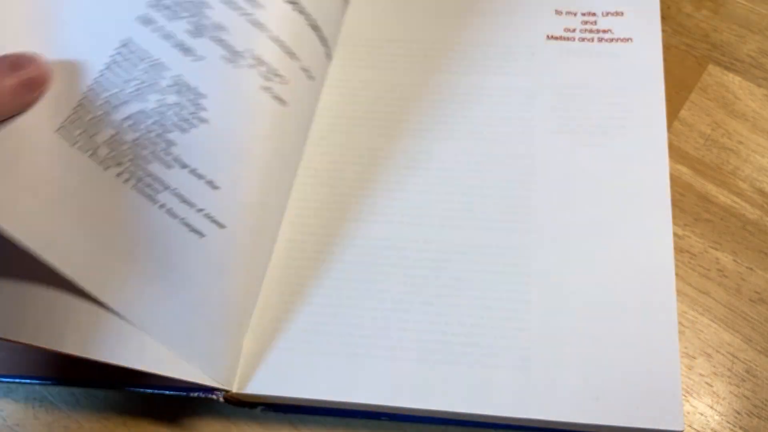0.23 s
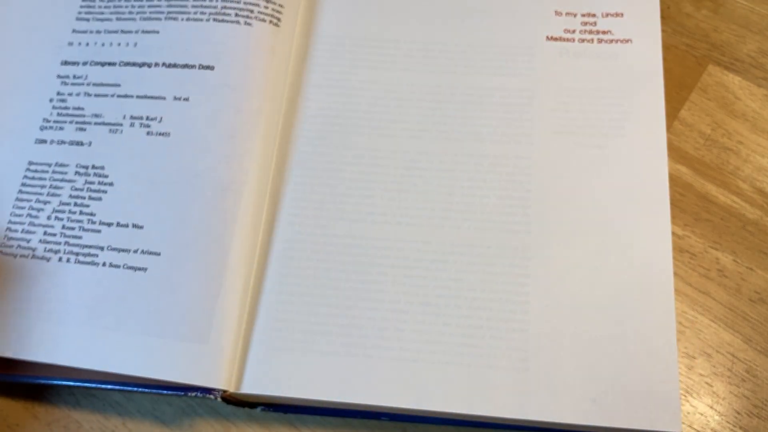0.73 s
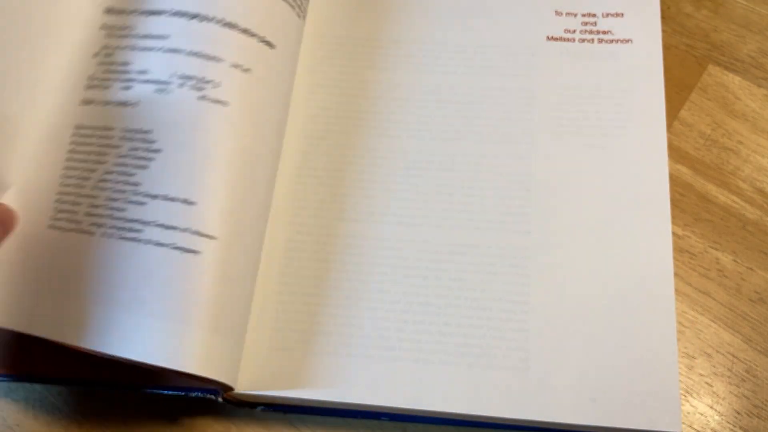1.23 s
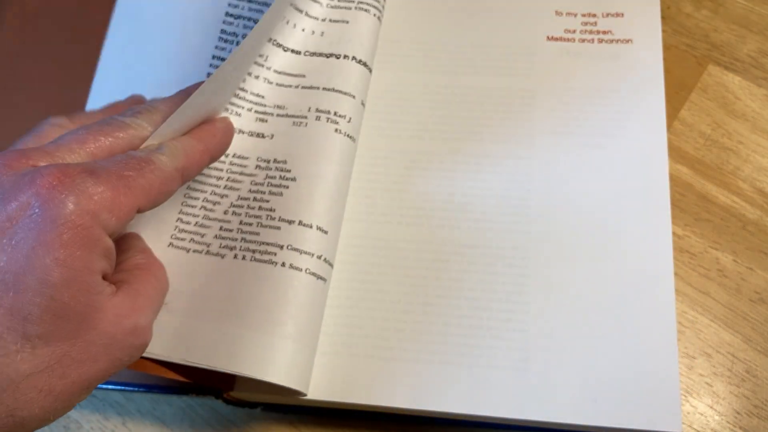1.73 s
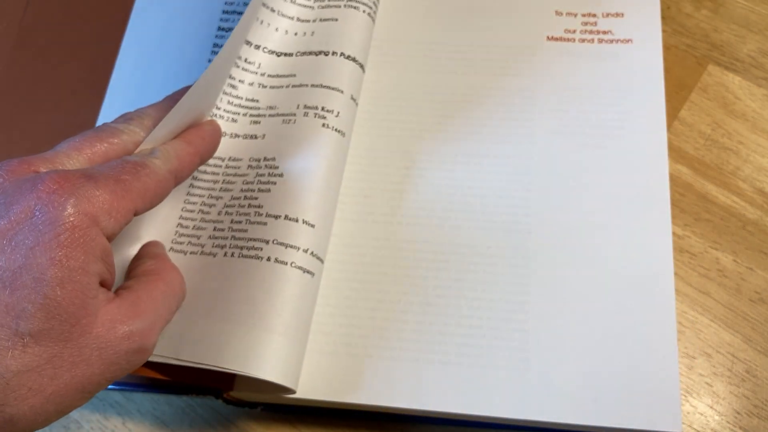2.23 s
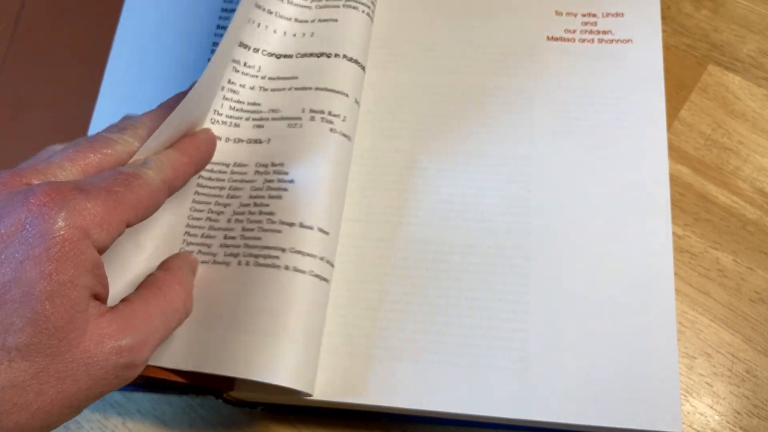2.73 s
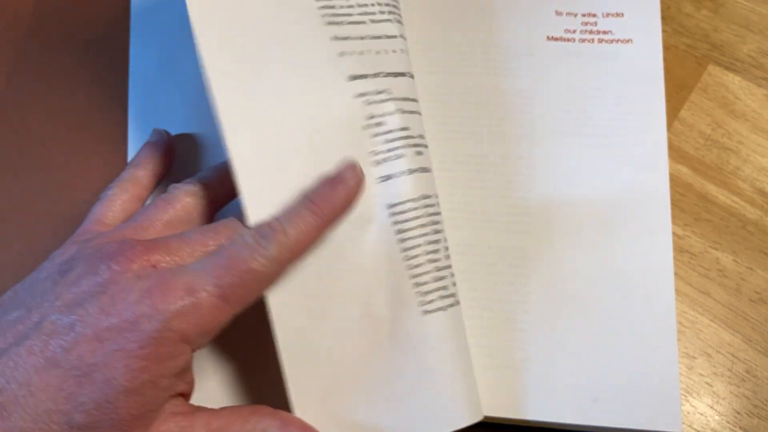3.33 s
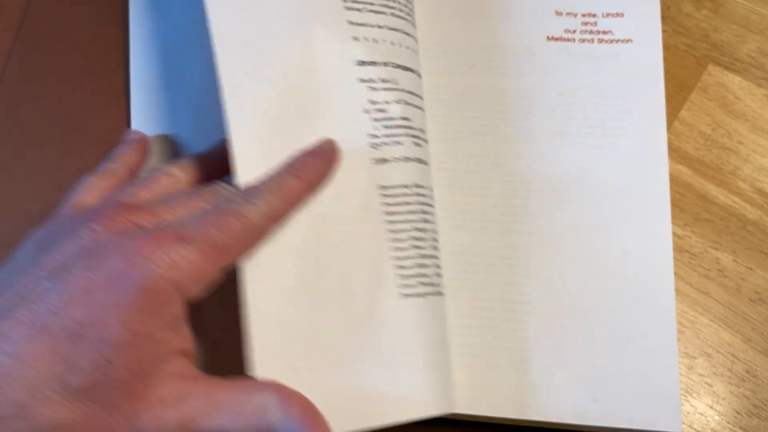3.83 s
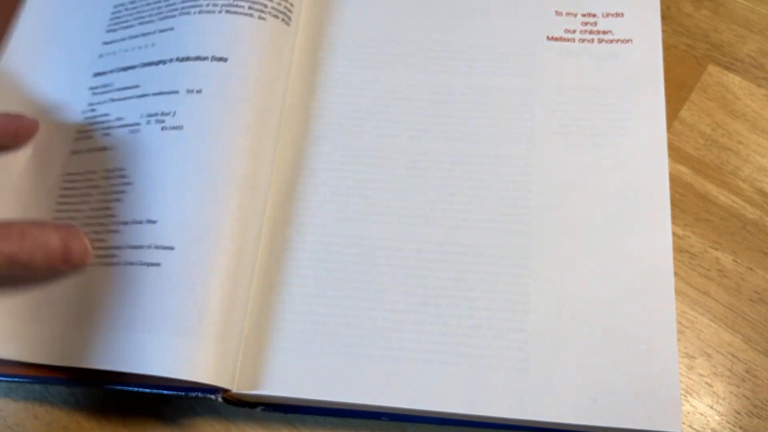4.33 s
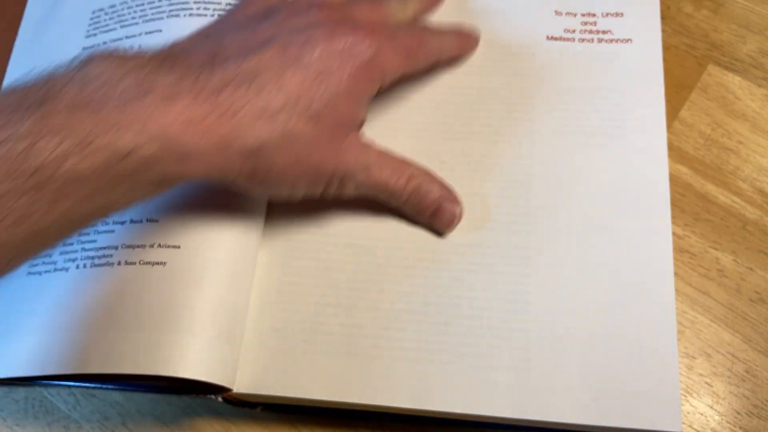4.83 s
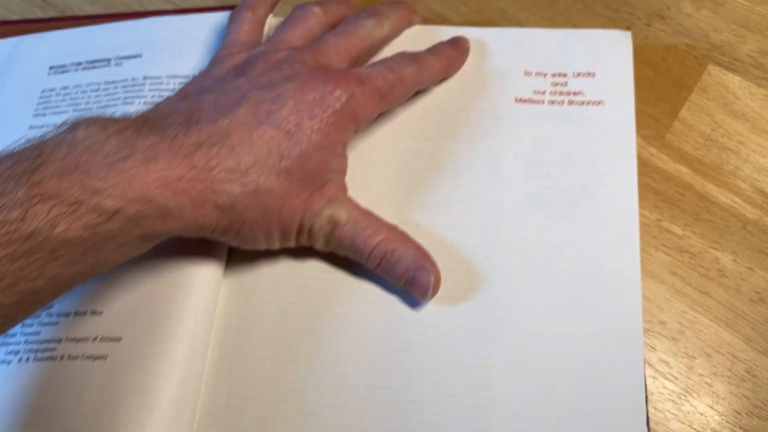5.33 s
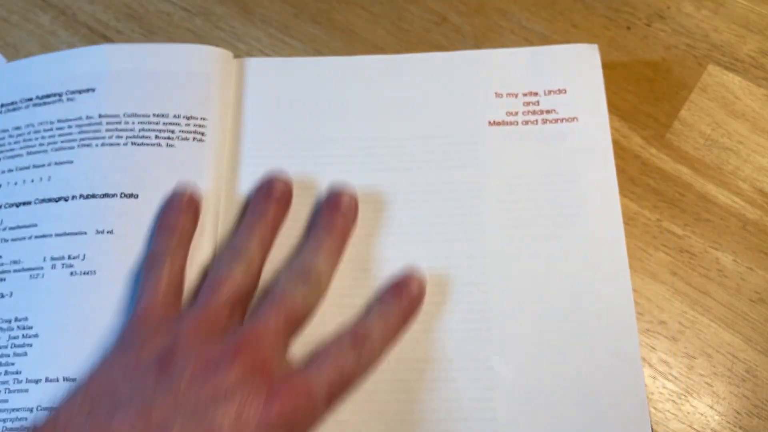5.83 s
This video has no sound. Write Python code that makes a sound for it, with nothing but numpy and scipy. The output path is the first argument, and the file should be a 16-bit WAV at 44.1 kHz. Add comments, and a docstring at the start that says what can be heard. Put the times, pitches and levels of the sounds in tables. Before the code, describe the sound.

Stiff book pages turned by hand, sliding and snapping crisply, then smoothed flat with a palm in a quiet room.

```python
"""Turning the pages of a hardback

A quiet room, the microphone close to a book on a wooden table, a hand turning the stiff leaves.
Sheets slide over each other with a grainy hiss; each time a bent sheet buckles it snaps and rattles.
Page edges scuff and the page block thuds softly under the fingers. At the end the palm smooths
the open pages flat and the fingertips squeak faintly to a stop."""
import sys
import numpy as np
from scipy import signal
from scipy.fft import rfft, irfft, next_fast_len
from scipy.io import wavfile
from scipy.ndimage import map_coordinates

SR = 44100
rng = np.random.default_rng(int(sys.argv[2]) if len(sys.argv) > 2 else 0)


def wav_record(signal):
    """Record a signal, one row per channel, as 16-bit PCM in the file named by sys.argv[1]."""
    frames = np.transpose(np.atleast_2d(signal))
    bounded = np.clip(frames, -1, 1)
    # unit amplitude maps onto the largest positive 16-bit level
    quanta = np.round(bounded * 32767).astype(np.int16)
    wavfile.write(sys.argv[1], SR, quanta)


N = 267863
T = np.arange(N) / SR

# Bent sheets buckling close to the microphone. Each row: start in seconds, energy in dB, low thump in dB,
# hollow tone near 2.5 kHz in dB, ring in dB, ring pitch in Hz, crispness in dB, first crack's share 0-1.
BUCKLES = [(0.106, -11, 16, 0, 5.5, 4300, -7, 0.25), (0.12, -5, -4, 1.5, 9, 2900, -18, 0.28),
           (0.1435, -9.5, -5, -8, -4, 4100, -18, .1), (0.182, -20, -1, -21, -18, 4100, -12, 0.46),
           (0.446, -30.5, -12, 0, -18, 4100, -9, 0.34), (1.0935, -6, -25, -8.5, 3, 1290, -14, 0.82),
           (1.3254, -.5, -2, -1.5, 4, 3870, 10.5, 0.23), (1.504, -2.5, 2, 6, 14.5, 4400, 9.5, 0.44),
           (1.688, -19, -2, -1, -8, 4100, -24, 0.4), (1.749, -17.5, -5, -8.5, -6, 4100, -16, .1),
           (2.263, -26, 6, -10, -12, 4100, -12, .2), (2.3184, 5.5, -9.5, 0.5, -1, 3900, 5, 0.02),
           (2.9292, -3.5, -3, 0, 7.5, 4400, 13.5, 0.22), (3.0236, -18, 10, 5, 0, 4100, 27, .5),
           (3.03, -5, -26, 1.5, -.5, 4100, 14, 1), (3.0323, -9, -8, 1, 3, 4100, 14, 0.67),
           (3.066, -9, 15, 4, -14, 4100, 1, 0.75), (3.0747, -15, -2, 2, -4, 4100, 10, .3),
           (3.167, -3.5, -2, -0.5, 8.5, 4800, -3, 0.44), (3.3119, -8, -1, 1, 5.5, 4440, -2, 0.25),
           (3.327, -9.5, 0, 0, -4, 4100, -11, 0.2), (3.5617, -11, -4, -5, -1, 4630, -19, 0.14),
           (3.579, -11, -2.5, -3, -5, 3960, -3.5, 0.25), (3.7444, -9, 6, -6, -1, 4300, -10.5, 0.45),
           (3.887, -15, -3, -5, -10, 4100, -12, 0.08), (3.934, -17.5, -5, -8, -11, 4100, -12, 0.03),
           (4.0569, -3, -8, 2.5, 1.5, 3900, 4.5, 0.44), (4.0936, -15.5, -13, 6.5, 2, 4100, -6, 0.5),
           (4.1118, -8, -1, 2, 15.5, 4260, -3, 0.5), (4.1134, 3, -9.5, -10.5, 18.5, 3830, 0.5, 0.72),
           (4.1207, -4, -5.5, -3.5, -2, 3900, -8, 0.45), (4.3438, -15.5, -10, -1, -7, 4100, -9, 0.13),
           (4.6004, -8.5, -4.5, 3, -4.5, 3630, -13, 0.14), (5.007, -28, -8, 0, -19, 4100, -14, 0.65)]
# Tone of a buckling sheet. Each row: frequency in Hz, level in dB.
BUCKLE_COLOUR = [(60, -22), (220, -8.5), (330, -10.5), (480, -1), (1100, 1.5), (1600, -1), (2100, -4),
                 (3000, -5), (4000, 0.5), (5200, -9), (7000, -12), (10000, -24), (15000, -41)]
# The open book ringing on after a snap. Each row: frequency in Hz, width in Hz, relative level in dB.
BOOK_RESONANCES = [(554, 47, -1), (890, 24, 0.5), (1028, 29, 1.5), (1240, 40, -2), (1730, 72, -1),
                   (2317, 54, 2.5)]
# Swells of sliding hiss on paper: sheets moving and, last, the palm's first sweep. Each row: fastest
# moment, rise and fall in seconds, hiss in dB, body over hiss in dB, air over hiss in dB.
SLIDE_SWELLS = [(.17, .15, 0.061, -51.5, 1.5, -4.5), (.3, .05, 0.19, -67.5, 2.5, -10.5),
                (.66, 0.04, 0.084, -66, 0.5, -12), (.94, 0.052, 0.017, -60.5, 0.5, -2),
                (1.14, 0.07, 0.086, -57.5, -7.5, -4), (1.275, .05, 0.067, -55, -0.5, -3.5),
                (1.43, .03, .04, -59.5, -7.5, -4.5), (1.54, 0.05, 0.093, -59, 4.5, -3),
                (1.73, 0.063, 0.03, -59, 1, -6), (1.8, 0.044, 0.19, -75.5, 8.5, 6),
                (2.35, .06, 0.11, -74.5, 12, 2), (2.64, 0.032, 0.053, -71, 9, -3),
                (2.87, 0.095, 0.31, -60, 3, -0.5), (3.12, 0.038, 0.047, -54.5, 4.5, -2.5),
                (3.25, 0.073, 0.17, -63.5, 11, -1.5), (3.494, .014, 0.016, -65, 7.5, -7),
                (3.655, .015, .04, -65, 2.5, -3), (3.8, 0.062, 0.084, -65, 4, -1.5),
                (3.97, 0.077, 0.17, -59, -0.5, -2.5), (4.23, 0.055, 0.078, -60, 0.5, -2.5),
                (4.61, 0.084, 0.031, -59, 2, -3.5)]
# Tone of sliding on paper. Each row: frequency in Hz, level in dB.
SHEET_COLOUR = [(59, -59), (100, -10), (173, -5), (378, -8.5), (552, 0.5), (712, -8), (879, 4), (956, 0),
                (1230, 3), (1340, -0.5), (2220, -5.5), (4370, -2.5), (5170, -7), (8410, -15), (15500, -31)]
# The palm's pass over the page. Each row: time in seconds, hiss in dB before the palm's trim in the mix,
# body over hiss in dB, air over hiss in dB.
PALM_STROKE = [(4.66, -60.5, -0.5, 0), (4.788, -60, -2, -1.5), (4.916, -53, -8, -11.5),
               (5.026, -71, 9, 0.5), (5.174, -65, 4, 1), (5.416, -67, 4.5, 0), (5.45, -62.5, 2.5, -5.5),
               (5.79, -57.5, -4, 0.5), (5.852, -63.5, 1.5, 3), (5.918, -57.5, -11, -6),
               (5.982, -62.5, -2, -8), (6.02, -86.5, 9.5, -1), (6.06, -88, 5, 0)]
# Tone of skin on paper. Each row: frequency in Hz, level in dB.
PALM_COLOUR = [(59, -35), (100, 5), (223, 1), (420, 0.5), (712, 4.5), (956, 0.5), (1060, 4), (1130, 1),
               (1310, 1.5), (3930, -5), (4660, -9), (8230, -9.5), (15500, -18.5)]
# A page edge brushing its neighbours. Each row: start and length in seconds, level in dB,
# tilt above 900 Hz in dB per octave.
EDGE_SCUFFS = [(0, 0.025, -41.5, -13), (0.706, 0.017, -50.5, 0), (0.793, 0.049, -58.5, 1),
               (1.022, 0.048, -57.5, 0.5), (1.477, 0.024, -50, -6), (2.874, 0.022, -47.5, -8),
               (3.882, 0.029, -42.5, 0.5), (4.248, 0.023, -48, 2), (4.292, 0.056, -42.5, 3),
               (4.401, 0.037, -44.5, 0.5)]
# Fingers and page block pressing on the book. Each row: start in seconds, energy in dB, pitch in Hz.
BLOCK_THUDS = [(.978, -32.5, 540), (1.538, -24, 500), (3.066, -18, 112), (3.088, -20, 540),
               (3.117, -28.5, 130), (3.398, -22, 152), (4.713, -25.5, 150)]
# Skin or a sheet edge sticking and slipping. Each row: middle and spread in seconds, level in dB,
# pitch in Hz, nominal bandwidth in Hz.
SLIP_SQUEAKS = [(0.819, 0.017, -68, 7650, 1200), (.925, 0.025, -61.5, 7200, 700),
                (0.918, 0.019, -66, 10600, 700), (1.152, .04, -69, 10600, 1100),
                (2.887, 0.046, -64, 9250, 700), (4.712, 0.0018, -59, 6300, 400),
                (4.899, .04, -57, 3840, 600), (4.906, 0.038, -57, 1090, 170), (5.918, 0.04, -59, 3900, 452),
                (5.936, 0.055, -64.5, 713, 80)]
# Reflections reaching the microphone off table and cover. Each row: delay in seconds, gain.
NEAR_ECHOES = [(.0027, 0.049), (.0064, 0.023)]
# Room tone, the still air behind the book. Each row: frequency in Hz, relative level in dB.
ROOM_TONE_COLOUR = [(15, -43), (25, -8), (233, -2), (340, -7.5), (509, -5), (919, -24.5), (1080, -20),
                    (1170, -14), (2360, -23.5), (4150, -21.5), (7700, -25), (9050, -23.5), (10400, -28.5),
                    (11500, -27.5), (15500, -30.5)]


def snaps(size=16384, delay_at_1khz_s=0.000606, rise_s=0.00097, longest_t60_s=0.081, book_db=-12):
    """A buckle cracks once; bending waves then rattle to and fro in the sheet and set the book ringing."""
    out, t, hz = np.zeros(N), np.arange(size) / SR, freqs(size)
    octave = np.log2(hz)
    # bending waves are faster at high pitch, so the crack arrives as a very short chirp
    bending = np.exp(-4j * np.pi * delay_at_1khz_s * np.sqrt(1000 * hz))
    for s, db, thump_db, hollow_db, ring_db, ring_hz, crisp_db, share in BUCKLES:
        colour = curve(BUCKLE_COLOUR, hz)
        colour += thump_db / (1 + (hz / 700) ** 4)
        colour += crisp_db / (1 + (5800 / hz) ** 6)
        colour += hollow_db * bell(octave, np.log2(2500), 0.42)
        colour += ring_db * bell(octave, np.log2(ring_hz), 0.33)
        sheet = minimum_phase(colour)
        crack = unit(irfft(sheet * bending))
        # the more a buckle spends on its first crack, the sooner its rattle builds and dies
        t60 = longest_t60_s * (1 - 0.85 * share)
        build_up = 1 - np.exp(-t / (rise_s * (1 - share) + 1 / SR))
        rattle = unit(shape(burst(t, t60) * build_up, sheet))
        book = unit(shape(burst(t, 2.3 * t60), resonances(BOOK_RESONANCES, hz) * sheet))
        snap = np.sqrt(share) * crack + np.sqrt(1 - share) * (rattle + undb(book_db) * book)
        add(out, s - delay_at_1khz_s / 2, undb(db) * snap / np.linalg.norm(snap))
    return out


def slides(size, roundness=1.71):
    """A sheet or the palm speeds up over paper and coasts to rest; overlapping swells add their power."""
    power = np.zeros((3, N))
    for s, rise_s, fall_s, hiss_db, body_db, air_db in SLIDE_SWELLS:
        from_peak = np.abs(T - s) / np.where(T < s, rise_s, fall_s)
        speed = np.exp(-.5 * from_peak ** roundness)
        peak_gains = undb([hiss_db + body_db, hiss_db, hiss_db + air_db])
        power += np.outer(peak_gains, speed) ** 2
    grain = air_gap(fibres(size, catch_rate=500, catch_db=-10.5, flutter_db=2.15))
    return rubbing(np.sqrt(power), SHEET_COLOUR, grain)


def palm(size, landing_s=.03):
    """The palm settles on the page and strokes it flat without lifting."""
    s, hiss_db, body_db, air_db = np.transpose(PALM_STROKE)
    contact = np.clip(1 + (T - s[0]) / landing_s, 0, 1)
    gains = [contact * undb(np.interp(T, s, db)) for db in (hiss_db + body_db, hiss_db, hiss_db + air_db)]
    grain = air_gap(fibres(size, catch_rate=800, catch_db=-7, flutter_db=0.8))
    return rubbing(gains, PALM_COLOUR, grain)


def fibres(size, catch_rate, catch_db, flutter_db):
    """Friction: countless tiny slips, a few fibres that catch harder, and uneven pressure."""
    catches = (rng.random(size) < catch_rate / SR) * rng.standard_normal(size)
    slips = rng.standard_normal(size) + undb(catch_db) * unit(catches)
    pressure = undb(flutter_db * wander(70, size))
    return unit(slips * pressure)


def air_gap(grain, resonance_hz=3880, drift_octaves=0.063, drifts_per_s=2.85, reflection=0.061):
    """Friction noise bounces twice in the gap under sheet or hand; its comb glides as the gap changes."""
    i = np.arange(len(grain))
    lag = SR / (resonance_hz * 2 ** (drift_octaves * wander(drifts_per_s, len(grain))))
    return unit(sum(reflection ** k * map_coordinates(grain, [i - k * lag], order=3) for k in range(3)))


def rubbing(gains, colour, grain):
    """Friction heard through the sheet in three bands: a wide free sheet adds body, a light touch air."""
    hz = freqs(len(grain))
    paper = undb(curve(colour, hz))
    body = 1 / (1 + (hz / 2600) ** 6)
    air = 1 / (1 + (6000 / hz) ** 6)
    hiss = 1 - body - air
    return sum(gain * unit(shape(grain, paper * band))[:N] for gain, band in zip(gains, (body, hiss, air)))


def scuffs(size=8192):
    """The edge of a page drags past in a short, rough swell."""
    out, t, hz = np.zeros(N), np.arange(size) / SR, freqs(size)
    for s, length_s, db, tilt_db in EDGE_SCUFFS:
        grain = fibres(size, catch_rate=1100, catch_db=0.5, flutter_db=0)
        colour = curve(SHEET_COLOUR, hz) + tilt_db * np.log2(np.maximum(hz, 900))
        scrape = unit(shape(grain, undb(colour)))
        swell = np.sin(np.pi * np.minimum(t / length_s, 1))
        add(out, s, undb(db) * scrape * swell)
    return out


def thuds(size=8192):
    """The heavily damped page block answers a push with a few dull cycles."""
    out, t, hz = np.zeros(N), np.arange(size) / SR, freqs(size)
    for s, db, pitch_hz in BLOCK_THUDS:
        block = resonances([(pitch_hz, 1.2 * pitch_hz, 0)], hz) ** 2
        thud = shape(burst(t, t60=0.057), block)
        add(out, s, undb(db) * thud / np.linalg.norm(thud))
    return out


def squeaks(size=16384):
    """Fast, irregular slips ring one resonance of the pressed sheet until it almost sings."""
    out, t, hz = np.zeros(N), np.arange(size) / SR, freqs(size)
    middle_s = t[-1] / 2
    for s, spread_s, db, pitch_hz, width_hz in SLIP_SQUEAKS:
        slips = fibres(size, catch_rate=330, catch_db=-3, flutter_db=4)
        sheet = resonances([(pitch_hz, 1.14 * width_hz, 0)], hz) ** 2
        tone = unit(shape(slips, sheet))
        add(out, s - middle_s, undb(db) * tone * bell(t, middle_s, spread_s))
    return out


def room(x, wet_db, t60_low, t60_high, split_hz, size=22050):
    """Quick echoes from table and cover, then a faint tail whose treble dies first."""
    t = np.arange(size) / SR
    low = 1 / (1 + (freqs(size) / split_hz) ** 2)
    tail = shape(burst(t, t60_low), low) + undb(-10) * shape(burst(t, t60_high), 1 - low)
    response = undb(wet_db) * tail * (1 - np.exp(-t / 0.0013))
    response[0] += 1  # the direct path to the microphone
    for delay_s, gain in NEAR_ECHOES:
        response[int(delay_s * SR)] += gain
    return signal.fftconvolve(x, response)[:N]


def room_tone(size, level_db=-66.5):
    """The still air of the room: a steady, low hush."""
    colour = curve(ROOM_TONE_COLOUR, freqs(size))
    hush = shape(rng.standard_normal(size), undb(colour))
    return undb(level_db) * unit(hush)[:N]


def undb(db):
    """Decibels to gain."""
    return 10 ** (np.asarray(db) / 20)


def unit(x):
    """Scale to an rms of 1."""
    return x / np.sqrt(np.mean(x ** 2))


def freqs(size):
    """Frequencies of the bins of a real transform, kept above zero."""
    return np.maximum(np.fft.rfftfreq(size, 1 / SR), 1)


def curve(points, hz):
    """Level in dB of (Hz, dB) points joined on a log axis."""
    f, db = np.transpose(points)
    return np.interp(np.log(hz), np.log(f), db)


def shape(x, gain):
    """Filter by a gain for each frequency bin."""
    return irfft(rfft(x) * gain, len(x))


def minimum_phase(db):
    """Causal response of a dB curve: nothing sounds before the blow."""
    cepstrum = irfft(np.log(undb(db)))
    half = len(cepstrum) // 2
    return np.exp(rfft(np.r_[cepstrum[0], 2 * cepstrum[1:half], np.zeros(half)]))


def resonances(modes, hz):
    """Summed response of (Hz, width Hz, dB) resonances."""
    return sum(undb(db) / (1 + 1j * (hz / f - f / hz) * f / width) for f, width, db in modes)


def bell(x, centre, width):
    """Gaussian bump of height 1."""
    return np.exp(-.5 * ((x - centre) / width) ** 2)


def burst(t, t60):
    """Noise with an energy of 1 that falls 60 dB in t60 seconds."""
    x = rng.standard_normal(len(t)) * np.exp(-np.log(1000) * t / t60)
    return x / np.linalg.norm(x)


def wander(rate, size):
    """Glide between random values of spread 1, rate times a second."""
    step = np.arange(size) * rate / SR
    return np.interp(step, np.arange(size), rng.standard_normal(size))


def add(out, s, x):
    """Mix x into out from time s on."""
    i = max(int(s * SR), 0)
    out[i:i + len(x)] += x[:len(out) - i]


def scene(palm_trim_db=-1.6):
    """Paper and hand up close, the room and its hush behind them, in mono."""
    size = 2 * next_fast_len(N // 2 + 1)
    paper = snaps() + slides(size) + undb(palm_trim_db) * palm(size)
    paper = paper + scuffs() + thuds() + squeaks()
    at_microphone = room(paper, wet_db=-6.5, t60_low=0.27, t60_high=0.18, split_hz=2000)
    return (at_microphone + room_tone(size))[None]


def record(dry):
    """The small microphone loses the deepest bass, and the recorder cuts the top steeply."""
    low_cut = signal.butter(1, 45, "high", fs=SR, output="sos")
    top_cut = signal.ellip(10, .2, 70, 15850, fs=SR, output="sos")
    return signal.sosfilt(top_cut, signal.sosfilt(low_cut, dry))


dry = scene()
out = record(dry)
wav_record(out)
```